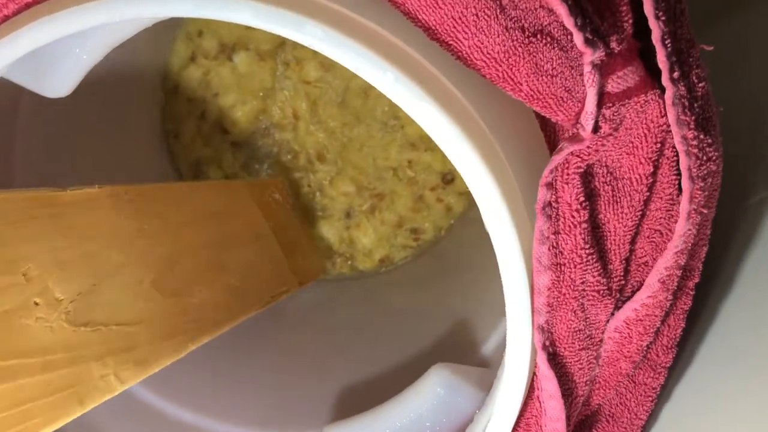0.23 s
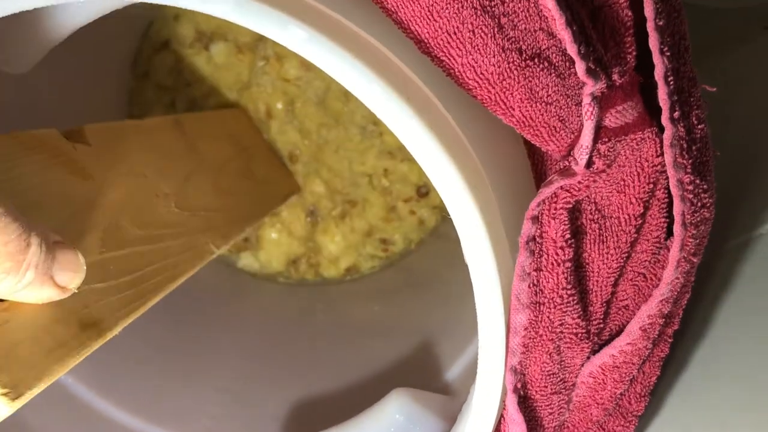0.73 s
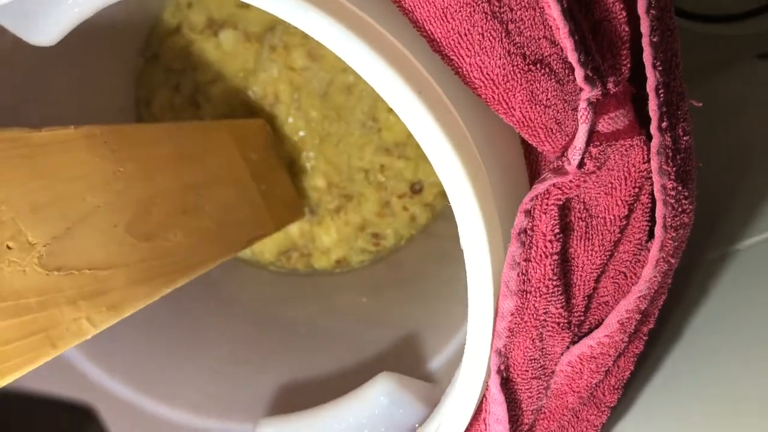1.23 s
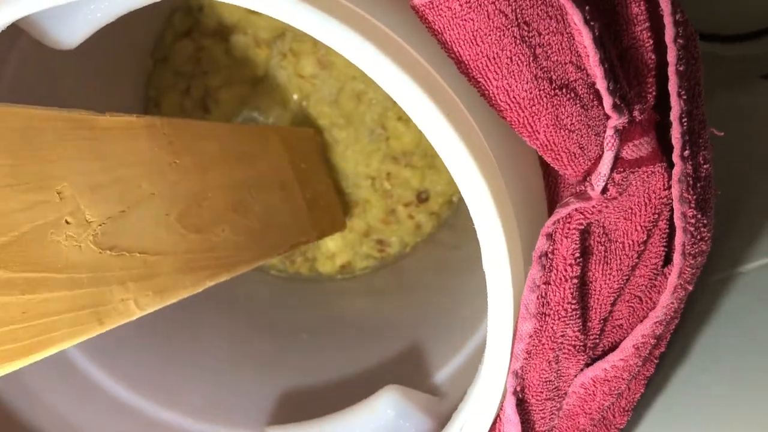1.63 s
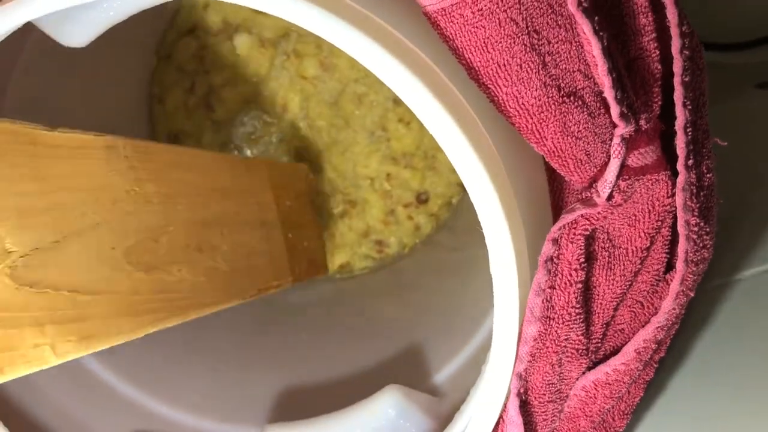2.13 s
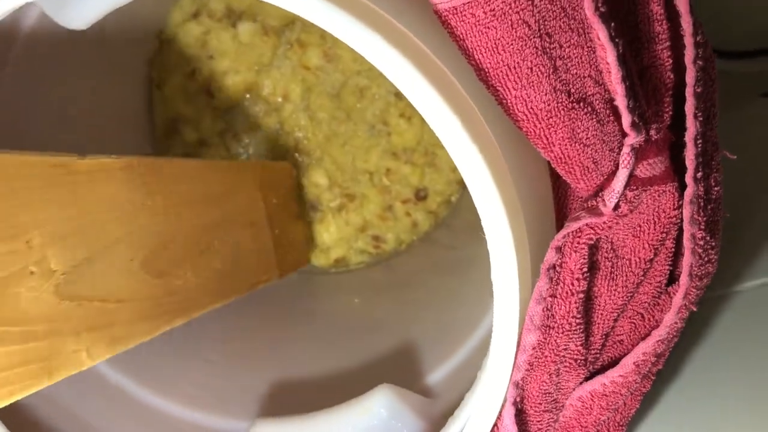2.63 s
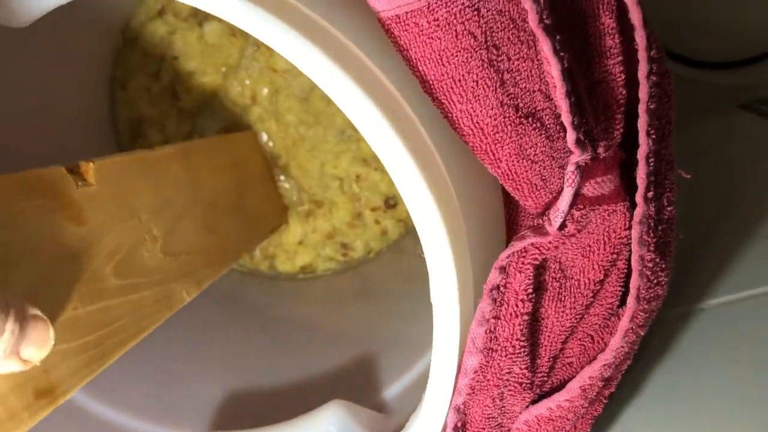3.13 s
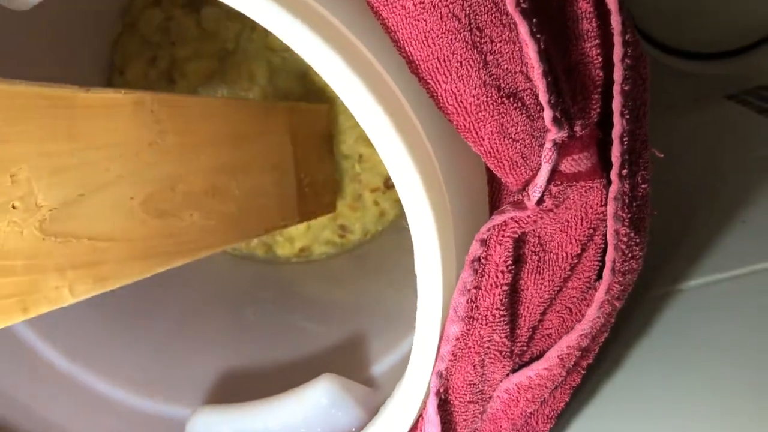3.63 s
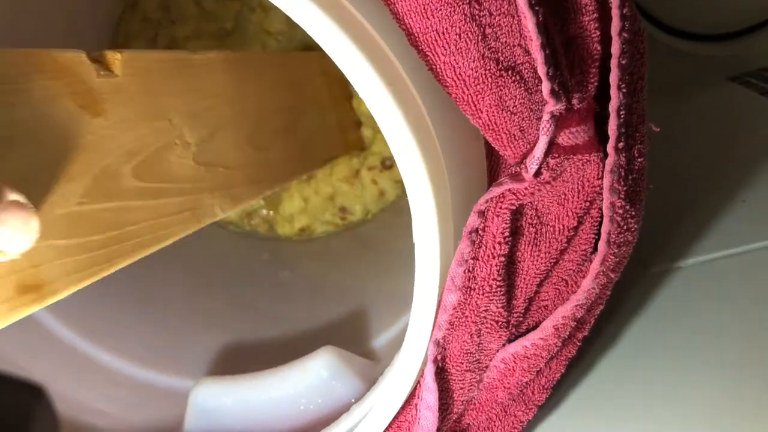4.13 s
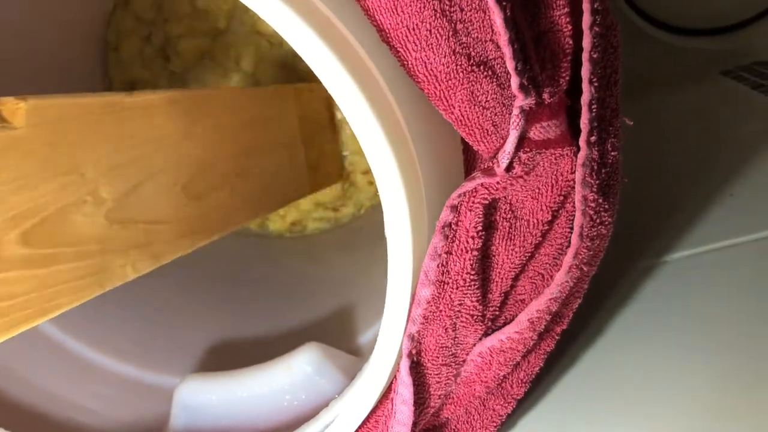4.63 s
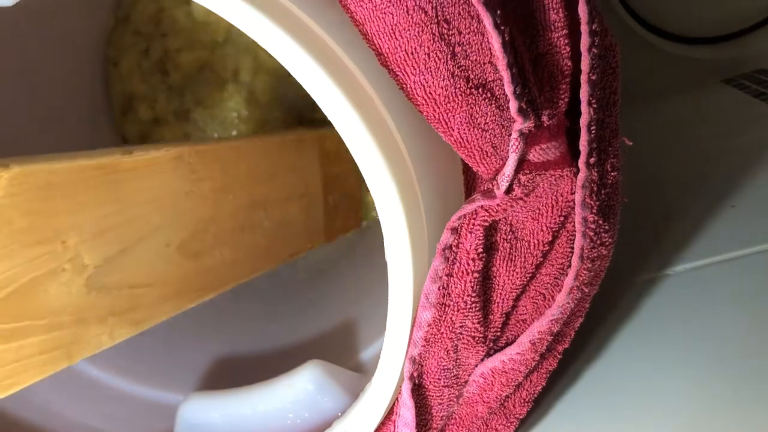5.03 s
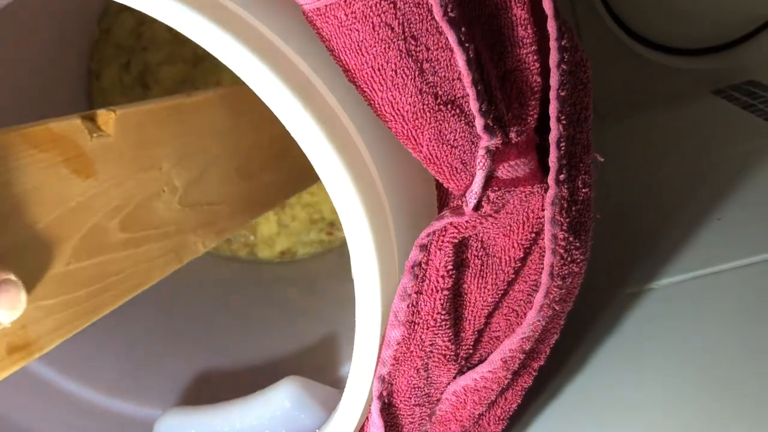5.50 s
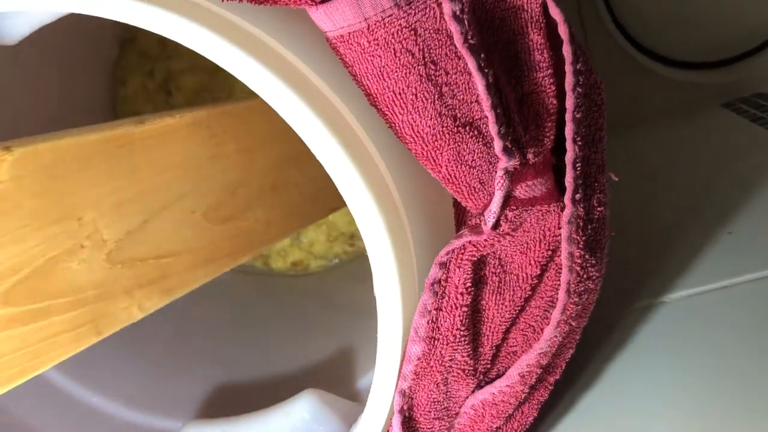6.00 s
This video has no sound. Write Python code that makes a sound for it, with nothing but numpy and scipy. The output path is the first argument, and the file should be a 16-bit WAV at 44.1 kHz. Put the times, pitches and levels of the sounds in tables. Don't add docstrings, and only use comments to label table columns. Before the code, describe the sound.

Hard wooden raps, rubbing squeaky scrapes and booming blows ring a plastic tub indoors, over faint pulp fizz, bubble ticks and a distant climbing engine hum.

```python
import sys
import numpy as np
from scipy import signal
from scipy.fft import rfft, irfft
from scipy.io import wavfile
from scipy.ndimage import uniform_filter1d

SR = 44100
rng = np.random.default_rng(int(sys.argv[2]) if len(sys.argv) > 2 else 0)


def output_pcm(signal):
    pcm = np.clip(np.atleast_2d(signal).T, -1, 1) * 32767
    wavfile.write(sys.argv[1], SR, np.round(pcm).astype(np.int16))


def how_loud(loudness_db):
    steps = np.asarray(loudness_db, float) / 20
    return 10 ** steps


N = 276066


def evened(x):
    return x / np.sqrt(np.mean(x ** 2) + 1e-20)


def read(points, hz):
    f, value = np.transpose(points)
    return np.interp(np.log(hz + 1), np.log(f + 1), value)


def curve(rows):
    s, *columns = np.transpose(rows)
    return [np.interp(np.arange(N) / SR, s, c) for c in columns]


def add(mix, start_s, sound):
    part = mix[round(start_s * SR):][:len(sound)]
    part += sound[:len(part)]


def coloured(x, points):
    hz = np.fft.rfftfreq(len(x), 1 / SR)
    return evened(irfft(rfft(x) * how_loud(read(points, hz)), len(x)))


def slow_noise(n, size):
    return evened(uniform_filter1d(rng.standard_normal(n), size))


def grit(spread_db, size):
    jumps = slow_noise(N, size)
    return rng.standard_normal(N) * how_loud(spread_db * jumps)


def resonate(x, hz, width_hz):
    pole = np.exp((-np.pi * width_hz + 2j * np.pi * hz) / SR)
    return 2 * signal.lfilter([1 - abs(pole)], [1, -pole], x).real


# start_s, hold_s, rasp_db, wall_db, belly_db [both over rasp]
SLIPS = [(.012, 0.024, -54, -10, 18), (0.395, 0.01, -40, 15.5, -22), (0.427, 0.019, -46.5, 20.5, 15),
         (0.482, 0.0052, -41.5, -10, 2.5), (0.51, 0.0045, -50, -11, 15), (0.718, 0.095, -43.5, 8, 5),
         (1.184, 0.069, -44, 13, 2), (1.309, 0.004, -41, -5, 14), (1.36, 0.056, -57, -4, -4),
         (2.631, 0.075, -34, 8.5, -6.5), (2.854, 0.025, -40.5, -21, -0.5), (3.099, 0.041, -44, -6.5, 0),
         (3.544, 0.059, -45, 13, 6.5), (4.109, 0.02, -47.5, -11, 4.5), (5.18, 0.06, -50, -18.5, -2),
         (5.308, 0.011, -48, -28, 8), (6.174, 0.01, -44.5, -17, 6), (6.221, 0.0071, -63, -17, 18),
         (1.7, 0.063, -75.5, -9, 29.5), (1.959, 0.055, -84, 0, 36)]
CATCH_S, SLIP_FROM_DB, SLIP_RELEASE_DB_PER_S = 0.0094, -13.5, -600
# start_s, rise_s, hold_s, rasp_db, wall_db [over rasp]
DRAGS = [(0, .0015, .012, -58.5, 19), (.05, 0.07, 0.019, -49, 15), (0.834, 0.017, 0.13, -73.5, 2),
         (1.433, 0.037, .08, -71, 10), (1.526, 0.078, .09, -51.5, 15), (1.708, .03, .17, -71, 16.5),
         (1.872, .26, .1, -47.5, 15.5), (2.244, 0.043, .1, -44.5, 12.5), (2.44, 0.039, .012, -39.5, 9),
         (2.506, 0.0095, .04, -58, 1), (5.43, 0.054, .07, -62, 1)]
DRAG_FROM_DB, DRAG_RELEASE_DB_PER_S, DRAG_BELLY_DB = -25, -500, -9
# pitch_hz, width_hz, level_db
WALL_MODES = [(506, 42, 4.5), (713, 24.3, 8), (996, 17, -7), (1284, 30, -2), (1561, 49, -5),
              (1905, 73, 0.5), (2812, 120, -6.5), (2774, 120, -16), (3290, 440, -29)]
# pitch_hz, width_hz, level_db
BELLY_MODES = [(132, 10, 5.5), (160, 77, -2), (236, 54, 2), (345, 17, 3)]


def strokes():
    drive = grit(2.3, size=110)
    push, shake, heave = np.zeros((3, N))
    rows = []
    for start_s, hold_s, *levels_db in SLIPS:
        force = contact_force(CATCH_S, hold_s, SLIP_FROM_DB, SLIP_RELEASE_DB_PER_S)
        rows.append((start_s, force, *levels_db))
    for start_s, rise_s, hold_s, rasp_db, wall_db in DRAGS:
        force = contact_force(rise_s, hold_s, DRAG_FROM_DB, DRAG_RELEASE_DB_PER_S)
        rows.append((start_s, force, rasp_db, wall_db, wall_db + DRAG_BELLY_DB))
    for start_s, force, rasp_db, wall_db, belly_db in rows:
        add(push, start_s, force * how_loud(rasp_db))
        add(shake, start_s, force * how_loud(rasp_db + wall_db))
        add(heave, start_s, force * how_loud(rasp_db + belly_db))
    wall = how_loud(-4.5) * ring(shake * drive, WALL_MODES) / np.std(ring(drive, WALL_MODES))
    belly = how_loud(-3.5) * ring(heave * drive, BELLY_MODES) / np.std(ring(drive, BELLY_MODES))
    return how_loud(2.16) * push * rasp_of(drive), wall + belly


def contact_force(rise_s, hold_s, from_db, release_db_per_s):
    t = np.arange(0, rise_s + hold_s + .1, 1 / SR)
    sag_db_per_s = -33
    db = from_db * (1 - np.minimum(t / rise_s, 1))
    db += sag_db_per_s * np.maximum(t - rise_s, 0)
    db += release_db_per_s * np.maximum(t - rise_s - hold_s, 0)
    return how_loud(db) * np.minimum(t / .003, 1)


def ring(x, modes):
    t, out = np.arange(N) / SR, np.zeros(N)
    for k, (hz, width_hz, db) in enumerate(modes):
        travel_db = 4.5 * np.sin(2 * np.pi * (rng.uniform(1.5, 5) * t + rng.random()))
        out += (-1) ** k * resonate(how_loud(db + travel_db) * x, hz, 1.64 * width_hz)
    return out


# pitch_hz, density_db [dB per Hz]
RASP = [(880, -7), (1500, -6), (2390, -10.5), (2490, -20.5), (3380, -6.5), (3690, -9.5), (5540, -12.5),
        (6310, -16.5), (10300, -19.5), (16000, -28.5)]


def rasp_of(drive):
    grain_hz, t = np.arange(1500, 16500, 70.), np.arange(N) / SR
    out = np.zeros(N)
    for k in range(3):
        ripple_db = 5.5 * rng.standard_normal(len(grain_hz)).clip(-2, 1.6)
        board = zip(grain_hz, read(RASP, grain_hz) + ripple_db)
        fade = np.cos(np.pi * (3.1 * t + k / 3)) ** 2
        out += fade * coloured(drive, [RASP[0], *board, (17000, -60)])
    return evened(out)


# start_s, blow_db, boom_db, crack_db [both over blow], damping [factor on t60]
LOW_KNOCKS = [
    (1.319, -27.5, -7.5, -4.5, 0.52),
    (2.489, -26.5, 0, -20.5, 0.94),
    (2.514, -25.5, -10, -23, 0.85),
    (3.133, -7.5, -7.5, -13, 0.92),
    (3.150, -5.5, -4, -4.5, 0.36),
    (3.197, -18.5, 5.5, -5, 0.7),
]
SIDE_KNOCKS = [
    (.407, -25, -15, -8.5, 0.72),
    (1.482, -42.5, -1.5, 6, 0.46),
    (2.557, -16, -7, -13, 0.58),
    (4.385, -15, -18, -7, 0.24),
    (4.39, -19, 2, -17.5, 0.94),
    (4.405, -21, 0.5, -20, 0.52),
    (5.326, -39.5, 2.5, -20, 0.22),
    (5.456, -41, -9, -12, 1),
    (6.186, -44, 0.5, -0.5, 0.6),
]
RIM_KNOCKS = [
    (0.052, -30, -0.5, -3.5, 0.67),
    (0.133, -9.5, -13, -2, 0.51),
    (0.148, -53, -25.5, -14, 0.7),
    (0.182, -28, 4, -14, 0.33),
]
# pitch_hz, density_db [dB per Hz]
LOW_RING = [(260, 0), (330, -15), (430, -5.5), (560, -5.5), (680, -7), (880, -2.5), (1150, -15),
            (1400, -11), (1800, -9.5), (2300, -26.5), (2700, -36), (4500, -51), (5850, -81), (9900, -120)]
SIDE_RING = [(150, -32), (260, -8), (342, -0.5), (532, -4), (734, -2), (798, -25), (888, 2), (1050, -16.5),
             (1730, -27.5), (4500, -80.5), (5850, -87), (9900, -120)]
RIM_RING = [(150, -44), (260, -27.5), (530, -13), (1220, -33), (1330, -19.5), (1540, -2), (1950, -4.5),
            (2480, -14), (4220, -37), (6990, -26), (9000, -15), (11700, -71.5), (19800, -120)]
# pitch_hz, level_db, t60_s
LOW_BOOM = [(126, 4.5, 0.17), (187, -9, 0.31), (232, 1, 0.21)]
SIDE_BOOM = [(130.6, -5.5, 0.17), (173, -4, .3), (215, 2.5, 0.088)]
RIM_BOOM = [(116.8, 0, 0.11), (161.4, -4, 0.11), (236.3, -10, 0.29)]
LOW_RISE_MS, SIDE_RISE_MS, RIM_RISE_MS = 3.1, 1.3, 2.47


def knocks():
    out = np.zeros(N)
    for blows, *place in ((LOW_KNOCKS, LOW_RING, LOW_BOOM, LOW_RISE_MS),
                          (SIDE_KNOCKS, SIDE_RING, SIDE_BOOM, SIDE_RISE_MS),
                          (RIM_KNOCKS, RIM_RING, RIM_BOOM, RIM_RISE_MS)):
        for start_s, *blow in blows:
            add(out, start_s, knock(*place, *blow))
    return out


# pitch_hz, t60_s
WALL_DECAY = [(260, 0.25), (600, 0.13), (1500, 0.092), (3000, 0.18), (9000, 0.01)]


def knock(ring_points, boom, rise_ms, blow_db, boom_db, crack_db, damping):
    t = np.arange(SR // 2) / SR
    hz = np.geomspace(260, ring_points[-3][0], 56) * (1 + .025 * rng.standard_normal(56))
    level_db = read(ring_points, hz) + 10 * np.log10(hz)
    boom_hz, low_db, boom_t60_s = np.transpose(boom)
    t60_s = damping * np.r_[boom_t60_s, read(WALL_DECAY, hz)][:, None]
    hz, level_db = np.r_[boom_hz, hz][:, None], np.r_[low_db, level_db][:, None]
    rise = 1 - np.exp(-(t * 1000 / (rise_ms * (600 / hz) ** 0.9)) ** 2)
    tone = np.sin(2 * np.pi * (hz * t + 0.33 * rng.random(hz.shape)))
    swing = rise * how_loud(level_db - 60 * t / t60_s) * tone
    group = (hz[:, 0] > 250).astype(int) + (hz[:, 0] > 1300)
    groups = np.array([swing[group == k].sum(0) for k in range(3)])
    groups *= np.minimum((t[-1] - t) / .05, 1) / abs(groups).max(1, keepdims=True)
    return how_loud([blow_db + boom_db, blow_db, blow_db + crack_db]) @ groups


# start_s,
# peak_db, pitch_hz, length_ms
TICKS = [(0.014, -26, 6200, 4.9), (0.054, -31, 3860, 2.7), (0.1337, -8, 3290, 8.9),
         (0.2493, -50, 3730, 1.7), (0.4907, -19, 6650, 8.1), (0.5144, -18.5, 6400, 4.7),
         (0.7245, -36.5, 4360, 1.9), (1.014, -43.5, 14000, 1.9), (1.314, -25.5, 3820, 1.9),
         (1.396, -37, 7200, 4.4), (1.4366, -40.5, 7340, 2.2), (1.483, -36, 4430, 2.4),
         (2.46, -42, 5270, 1.8), (2.4768, -48, 3710, 1.7), (2.8606, -27, 4830, 7.2),
         (2.874, -32.5, 324.4, 9.8), (3.1177, -29, 3830, 3.9), (3.488, -43, 8540, 3.5),
         (4.1169, -25.5, 6400, 1.9), (4.221, -37, 3970, 3.2), (4.386, -43, 3280, 3.8),
         (4.769, -45, 8370, 3.5), (5.1831, -31.5, 4060, 1.9), (5.3068, -37, 5680, 1.9),
         (5.3212, -28, 4210, 2.7), (6.0212, -47, 5620, 1.27), (6.1757, -30, 4470, 2.5),
         (6.2265, -36, 5660, 4.6)]


def ticks():
    out, t = np.zeros(N), np.arange(800) / SR
    for start_s, peak_db, hz, length_ms in TICKS:
        snap = rng.standard_normal(800) * np.exp(-t * 1000 / length_ms) * np.minimum(t / 0.00045, 1)
        centre_hz, width_hz = min(hz, 15500), 0.78 * hz
        rung = resonate(resonate(snap, centre_hz, width_hz), centre_hz, width_hz)
        snap = 0.053 * np.diff(snap, prepend=0) + rung
        add(out, start_s, how_loud(peak_db - 2.5) * snap / abs(snap).max())
    return out


# time_s, level_db
FIZZING = [
    (0, -61),
    (1.0, -63.5),
    (1.6, -60),
    (2.3, -65.5),
    (3.4, -61.5),
    (5.1, -61.5),
    (5.5, -58.5),
    (6.26, -59),
]
# pitch_hz, density_db [dB per Hz]
FIZZ = [(59, -27.5), (100, -5), (114, -13), (189, -10.5), (461, -20), (502, -14.5), (583, -23),
        (891, -22.5), (1450, -22.5), (1900, -27.5), (2900, -27.5), (4670, -20), (16000, -28.5)]


def pulp_fizz():
    fizz_db, = curve(FIZZING)
    pops = (rng.random(N) < 60 / SR) * how_loud(2.0 * rng.exponential(1, N).clip(0, 4)) * 6.3
    return how_loud(fizz_db + 0.5) * coloured(grit(1.3, size=500) + np.diff(pops, prepend=0), FIZZ)


# start_s, level_db
THUDS = [
    (0, -55),
    (0.129, -48.5),
    (1.31, -39),
    (2.48, -49),
    (3.14, -37),
    (4.38, -42),
]
# pitch_hz, density_db [dB per Hz]
RUMBLE = [(20, -27), (33, -11), (48, 1), (60, 3.5), (90, -12), (130, -20.5), (200, -53.5)]
RUMBLE_DB, THUD_RISE_S, THUD_T60_S = -67, .025, 0.49


def house_rumble():
    shaken, t = np.full(N, how_loud(RUMBLE_DB)), np.arange(SR) / SR
    for start_s, db in THUDS:
        add(shaken, start_s, (1 - np.exp(-t / THUD_RISE_S)) * how_loud(db - 60 * t / THUD_T60_S))
    return shaken * coloured(grit(0.9, size=5000), RUMBLE)


ENGINE_START_S, ENGINE_HZ, CLIMB_HZ_PER_S, ENGINE_DB, NEARING_DB_PER_S = 2.9, 57.5, 9.7, -65, 1.6


def engine():
    t = np.arange(N) / SR - ENGINE_START_S
    hz = ENGINE_HZ + CLIMB_HZ_PER_S * t
    db = ENGINE_DB + NEARING_DB_PER_S * t + 6.0 * np.minimum(t, 0)
    waver_db = 1.7 * slow_noise(N, size=4000)
    return np.sqrt(2) * how_loud(db + waver_db) * np.sin(2 * np.pi * np.cumsum(hz) / SR)


# pitch_hz, t60_s
ROOM = [(100, .65), (300, .62), (1000, .56), (1700, .52), (2300, .43), (2900, .3), (4500, .19), (9000, .11)]
LATE_DB, LATE_STRETCH = -15, 1.95


def room(x):
    taps = np.zeros(SR)
    at = np.arange(300, SR - 20, 20)
    taps[at + rng.integers(0, 20, len(at))] = rng.choice([-1., 1.], len(at))
    taps *= how_loud(2.5 * slow_noise(SR, size=150))
    hz, t, z = signal.stft(taps, SR, nperseg=512)
    t60_s = read(ROOM, hz)[:, None]
    decay = how_loud(-75 * t / t60_s) + how_loud(LATE_DB - 60 * t / (LATE_STRETCH * t60_s))
    tail = signal.istft(z * decay, SR, nperseg=512)[1]
    spectrum = rfft(tail, 2 * SR)
    power = abs(spectrum) ** 2 + 1e-20
    flatten = np.sqrt(uniform_filter1d(power, size=800) / uniform_filter1d(power, size=60))
    tail = irfft(spectrum * flatten)[:SR]
    return signal.fftconvolve(x, tail / np.linalg.norm(tail))[:N]


# pitch_hz, width_hz, level_db
ROOM_MODES = [(113, 2.9, 4), (126.6, 7, 1), (215, 9, -8.5), (252, 8.6, -15.5)]


def room_boom(blows):
    return sum(how_loud(db) * resonate(blows, hz, width_hz) for hz, width_hz, db in ROOM_MODES)


def scene():
    rasp, wall = strokes()
    blows, pops = knocks(), ticks()
    echo = room(how_loud(-14.5) * blows + how_loud(-16.0) * wall + how_loud(-15.0) * (rasp + pops))
    echo += room_boom(blows)
    low_cut = signal.butter(3, 100, "high", fs=SR, output="sos")
    bucket = signal.sosfilt(low_cut, rasp + wall + blows + pops + echo)
    return (bucket + pulp_fizz() + house_rumble() + engine())[None]


def low_pass(x):
    return signal.sosfilt(signal.butter(12, 16690, fs=SR, output="sos"), x)


# time_s, lowest_dipped_hz, depth_db, lone_tones_db
TREBLE_DIPS = [(.388, 3000, -22, -72), (.58, 3500, -12, -75), (1.345, 2300, -24, -80), (2.286, 2500, -10, -46),
               (2.453, 2500, -8, -59), (2.886, 600, -14, -41), (2.929, 1000, -10, -59), (2.994, 800, -22, -80),
               (3.008, 800, -22, -69), (3.33, 2700, -18, -80), (3.561, 2300, -10, -49), (3.65, 2500, -10, -66),
               (4.097, 2500, -20, -60), (4.312, 400, -9, -70), (4.46, 2200, -10, -75), (4.568, 1200, -8, -68),
               (4.865, 400, -10, -68), (4.91, 400, -10, -68), (5.185, 2000, -8, -57), (5.297, 2200, -18, -68)]


def record(dry):
    hz, t, z = signal.stft(dry, SR, nperseg=256)
    loss_db = sum(depth_db * np.outer(hz > low_hz, np.exp(-((t - time_s) / 0.0089) ** 6))
                  for time_s, low_hz, depth_db, _ in TREBLE_DIPS)
    loss_db -= 40 * (hz > 15900)[:, None]
    thinned = signal.istft(z * how_loud(loss_db), SR, nperseg=256)[1][:, :N]
    frame_s = np.arange(1300) / SR
    for time_s, low_hz, _, tones_db in TREBLE_DIPS:
        tones_hz = max(low_hz, 2000) + 1100 * np.cumsum(rng.uniform(.3, 1.5, 4))
        lone = how_loud(tones_db - 3.0) * np.sin(2 * np.pi * np.outer(frame_s, tones_hz)).sum(1)
        add(thinned[0], time_s - frame_s[-1] / 2, lone * signal.windows.tukey(1300, .6))
    return low_pass(thinned)


dry = scene()
out = record(dry)
output_pcm(out)
```